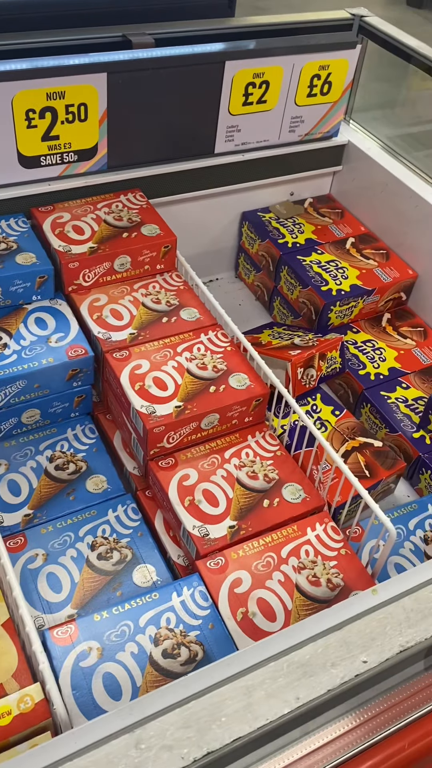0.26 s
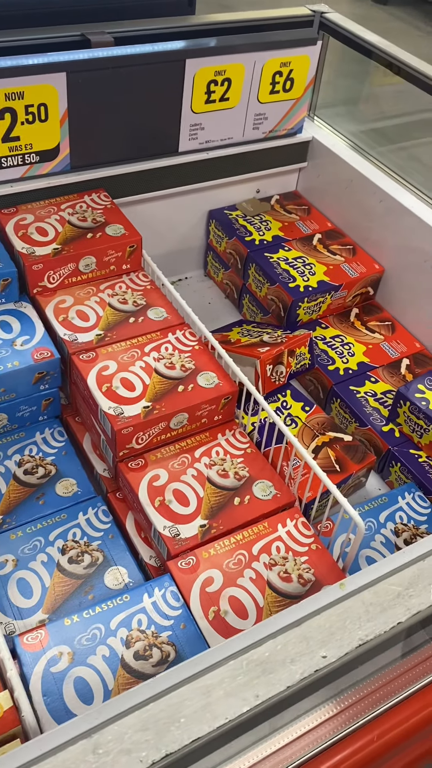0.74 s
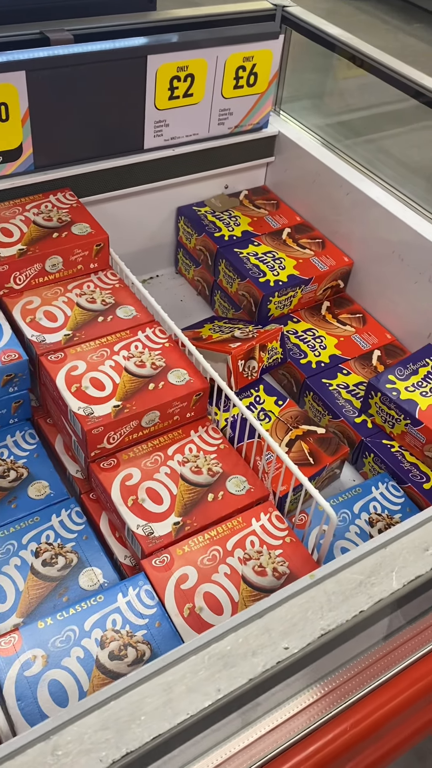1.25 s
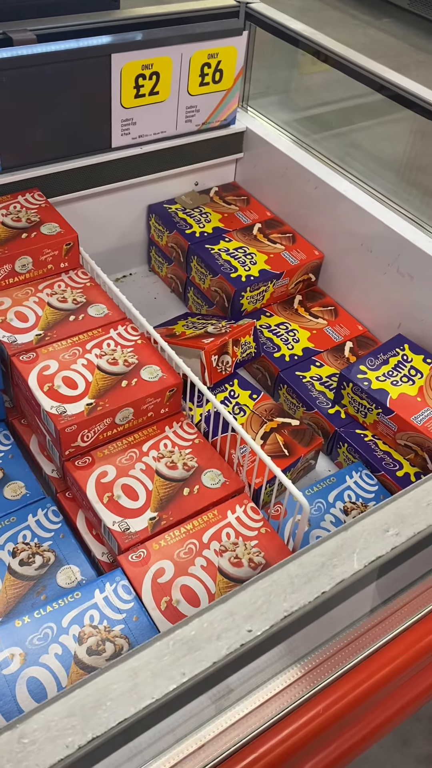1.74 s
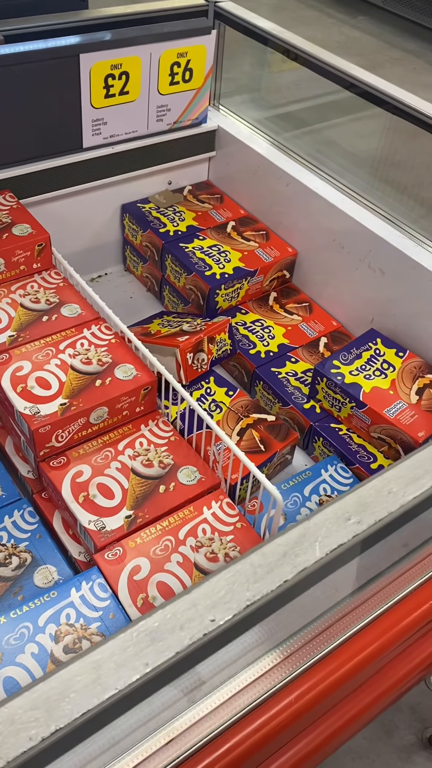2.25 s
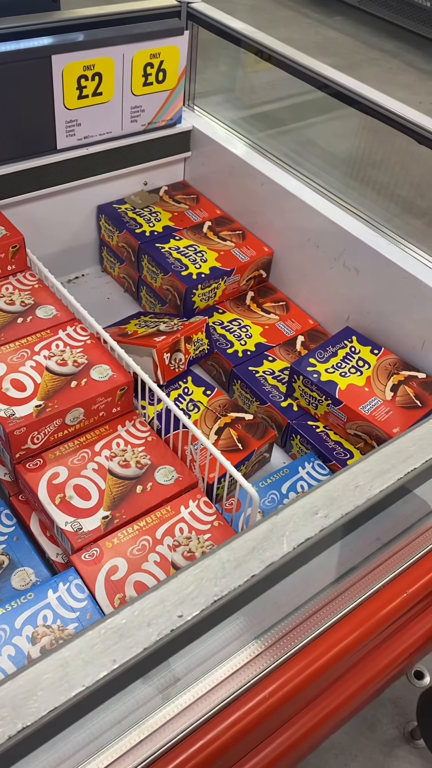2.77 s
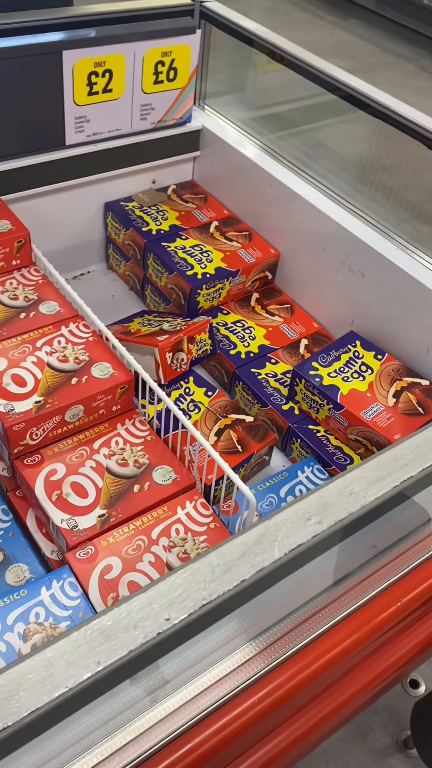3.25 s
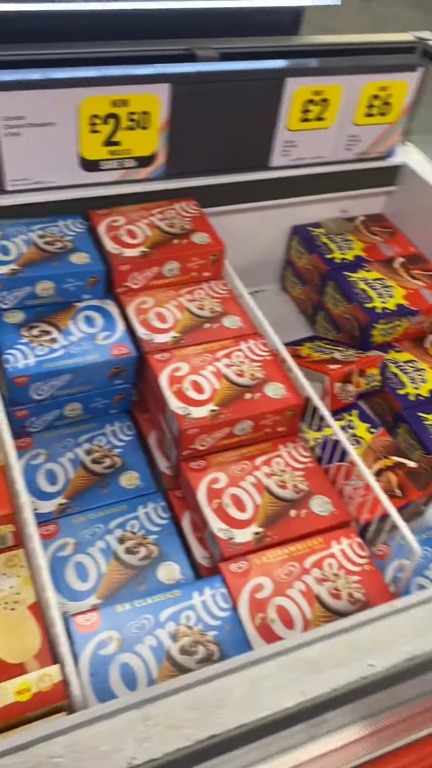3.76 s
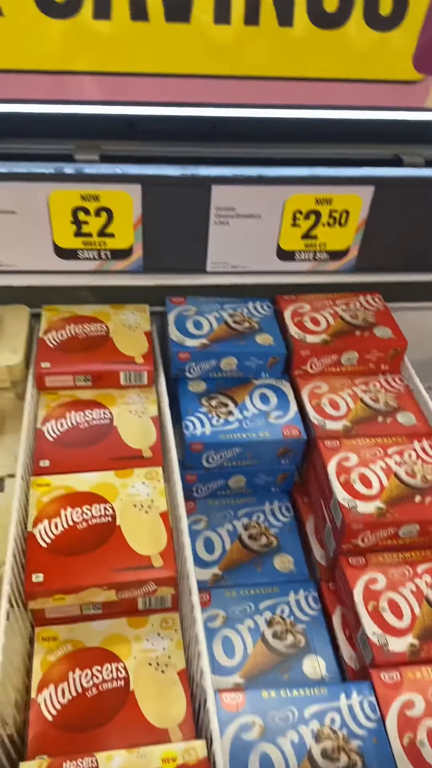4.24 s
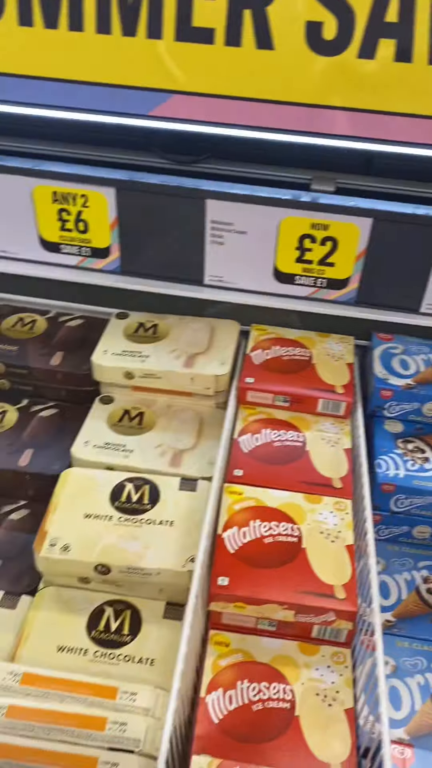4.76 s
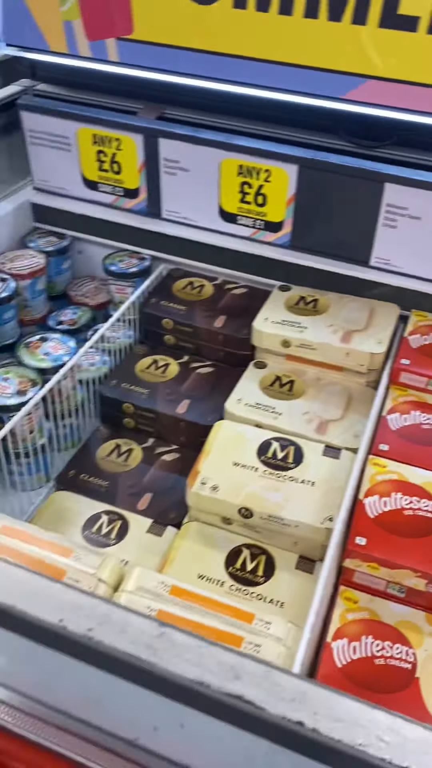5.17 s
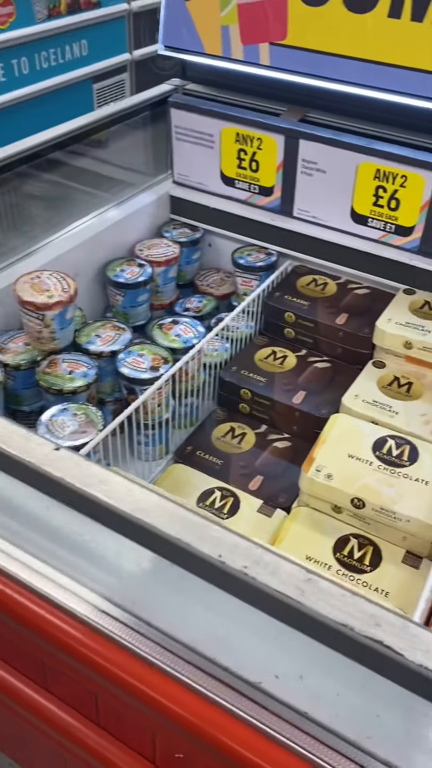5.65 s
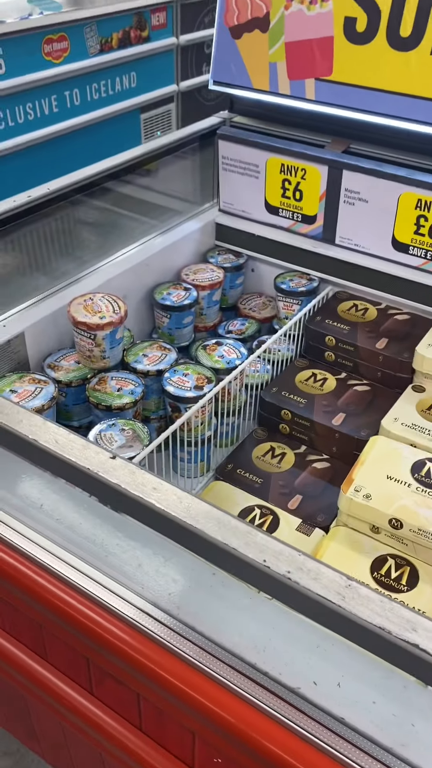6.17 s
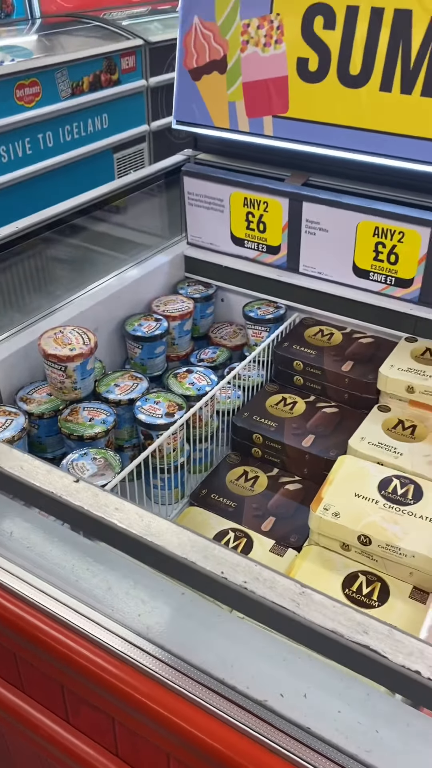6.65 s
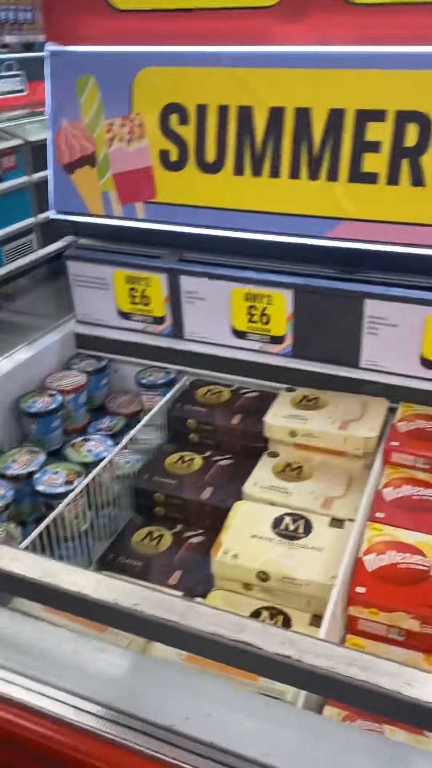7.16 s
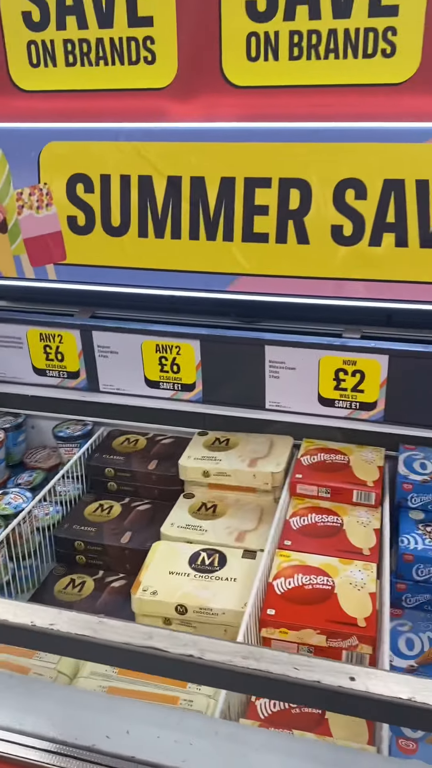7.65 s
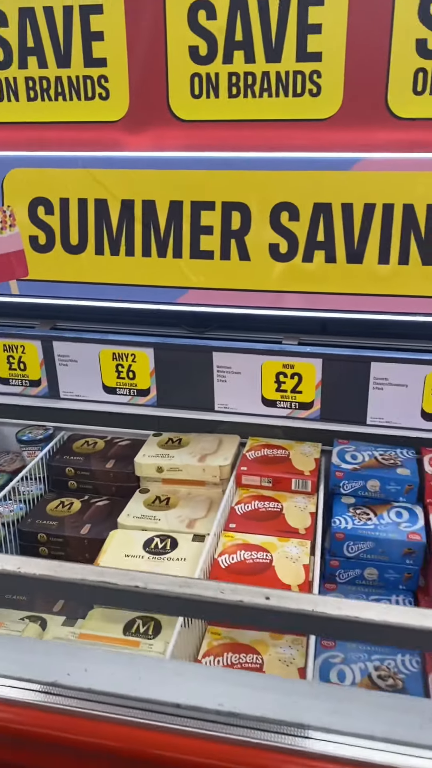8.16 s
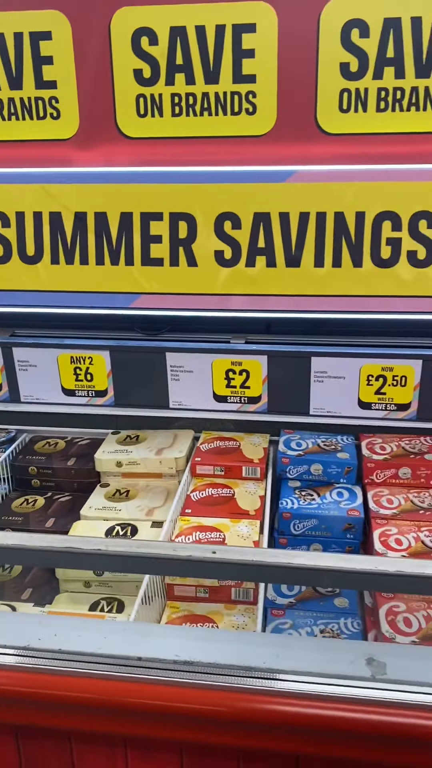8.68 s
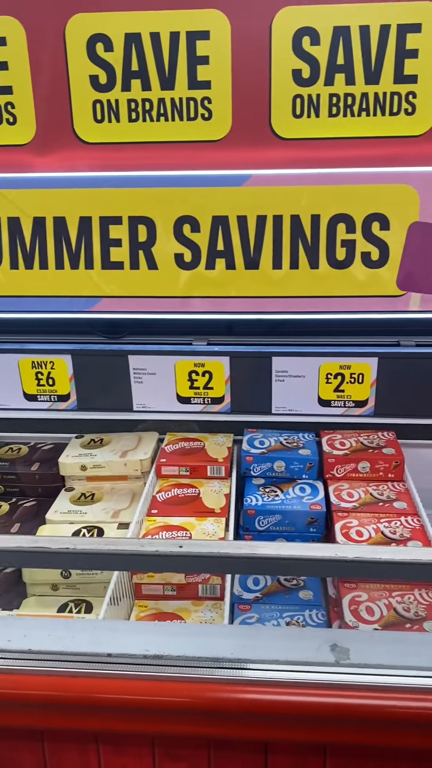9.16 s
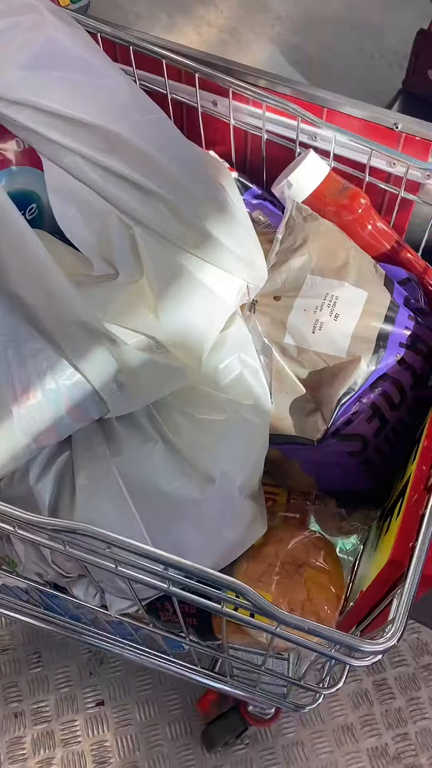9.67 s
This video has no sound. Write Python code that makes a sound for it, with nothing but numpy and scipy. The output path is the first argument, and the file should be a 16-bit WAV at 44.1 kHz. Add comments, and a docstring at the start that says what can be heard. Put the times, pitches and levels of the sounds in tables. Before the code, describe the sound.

A deep mains-like drone from shop freezers fills the foreground, with uneven compressor rumble, breezy hiss and faint high whistling that comes and goes. Small sleeve rustles run throughout, growing in the second half. After one short squeaky shoe scrape with hollow knocks, the drone grows fuller until it ends abruptly. A tiny gap follows, then dull distant room air, thin hiss and small far-off taps, heard from a handheld stereo microphone.

```python
"""A 100 Hz drone hums from a shop's freezer cabinets, with fan and compressor tones and rushing cold air.
Tones are beating or fluttering sines, valve whistles fuzzy ones, and air and rumble are shaped stereo noise.
A listener moves along the cabinets, a jacket rustles in swelling noise, and a shoe scuffs once with rasps and
short ringing knocks. The hum cuts off abruptly; after an instant of silence a quieter part of the shop is heard
as dull ventilation noise and thin hiss. Faint clatter rings far off as short narrow noise bands."""
import sys
import numpy as np
from scipy import signal
from scipy.fft import rfft, irfft, next_fast_len
from scipy.io import wavfile
from scipy.ndimage import uniform_filter1d, map_coordinates

SR = 44100
rng = np.random.default_rng(int(sys.argv[2]) if len(sys.argv) > 2 else 0)


def transcribe(signal):
    """Save signal, clipped to [-1, 1], as a 16-bit WAV file at the path in sys.argv[1]."""
    frames = np.atleast_2d(signal).T
    limited = np.clip(frames, -1, 1)
    pcm = np.round(limited * 32767).astype(np.int16)
    wavfile.write(sys.argv[1], SR, pcm)


N = 437031

# Level of the drone: time_s, level_db
DRONE_LEVEL = [(0, -32.5), (3.4, -29), (4.5, -34.5), (5.5, -28), (6.8, -28), (7.9, -24), (9.4, -21.5)]
# Level of the drone's overtone: time_s, level_db
OVERTONE_LEVEL = [(0, -38), (4.2, -38.5), (5.2, -40), (7.5, -40), (8.6, -45), (9.6, -45.5)]
# How far the compressor lags the overtone: time_s, lag_hz
COMPRESSOR_LAG = [(1.2, 3.3), (1.5, 2.9), (4.0, 2.9), (4.25, 3.35)]
# Fan and compressor tones before trim: pitch_hz, width_hz, first_place_db, second_place_db, third_place_db
MACHINE_TONES = [(49.3, 2, -40, -41, -36), (138, 4, -53, -43, -42), (148.3, 3, -43, -40.5, -45),
                 (248.7, 2, -46, -53, -59), (296, 7, -43, -40.5, -39.5), (311, 12, -43, -40.5, -41),
                 (341, 1.5, -52, -45, -49), (393.5, 1.5, -47, -63, -46), (437, 1.5, -50, -49, -54),
                 (487, 8, -57, -50, -58), (538, 2, -56, -58, -59), (592, 5, -49, -51, -50),
                 (633, 7, -57, -54, -62), (656, 7, -56, -56, -55), (731, 0.8, -62, -53.8, -52.8),
                 (783, 4, -64, -61, -65), (850, 20, -61, -59, -58), (877, 0.4, -63, -53, -53.3),
                 (925, 2.2, -57, -58.5, -58), (1170, 35, -63, -66, -62), (1558, 6, -67, -69, -65),
                 (1848, 6, -67, -62, -62.5), (2280, 35, -60, -61, -59), (2864, 5, -72, -63, -66)]
# The walk along the cabinets: time_s, standing_place (0 to 2, no unit)
WALK = [(0, 0.025), (4.0, 0.03), (5.6, 0.91), (7.0, 1.27), (8.5, 2)]
# Refrigerant whistle at the lower valve, before trim: time_s, level_db
LOW_VALVE_FLOW = [(0, -56.5), (1.05, -57), (1.24, -53), (1.45, -57.5), (2.0, -55), (2.55, -54.5),
                  (2.85, -58), (3.4, -54), (4.1, -56.5), (4.6, -62), (5.15, -54), (5.5, -52), (5.85, -48.5),
                  (6.3, -54), (6.7, -54.5), (7.0, -62), (7.4, -57), (8.3, -54.5), (8.9, -57), (9.6, -58)]
# Refrigerant whistle at the higher valve, before trim: time_s, level_db
HIGH_VALVE_FLOW = [(0.3, -64), (1.15, -62), (1.35, -53.5), (1.54, -51.5), (1.7, -59), (2.0, -55),
                   (2.45, -54.5), (2.7, -59), (3.3, -57), (3.5, -53), (3.8, -64), (4.8, -68), (5.35, -55),
                   (5.8, -56), (6.2, -60), (6.65, -56), (7.2, -67), (8.4, -62), (8.68, -52), (9.0, -61),
                   (9.4, -59), (9.54, -54), (9.62, -61)]
# Colour of the machine rumble: frequency_hz, relative_level_db (per Hz)
RUMBLE_COLOUR = [(20, -27), (36, -23), (45, -40), (54, -4), (68, 3.5), (90, -6.5), (120, -8.5), (170, -7),
                 (240, -9.5), (310, -14), (400, -14), (640, -19.5), (1000, -27.5), (2000, -54.5)]
# Brief peaks of the low noise: peak_s, level_db, length_s
LOW_NOISE_PEAKS = [(2.423, -25, 0.08), (3.582, -25, .12), (7.7, -22.5, 0.086)]
# Colour of the low-noise peaks: frequency_hz, relative_level_db (per Hz)
LOW_PEAK_COLOUR = [(30, -37), (48, -15), (62, 5), (80, -10), (130, -24), (400, -60)]
# Colour of the moving cold air: frequency_hz, relative_level_db (per Hz)
AIR_COLOUR = [(300, -25), (850, -4.5), (1150, 2), (1420, -1.5), (1650, 2), (1980, -1.5), (2550, -0.5),
              (3500, -4.5), (5300, -10.5), (7000, -18.5), (10500, -22), (12300, -9.5), (15500, -30)]
# Sweeps of a sleeve before trim: fastest_s, level_db, length_s
SLEEVE_SWEEPS = [(0.933, -49, .12), (1.15, -46.5, 0.18), (1.414, -46, 0.21), (1.71, -44.5, 0.1),
                 (2.106, -46, .1), (2.28, -48, 0.2), (2.692, -49, 0.14), (2.97, -44.5, 0.33),
                 (3.297, -47.5, 0.2), (3.58, -54, .14), (3.853, -46.5, 0.23), (4.78, -48, 0.77),
                 (5.157, -44, 0.44), (5.37, -48, 0.12), (5.627, -42.5, 0.37), (5.84, -43.5, 0.28),
                 (6.02, -44, 0.18), (6.3, -49, 0.37), (6.615, -36.5, 0.26), (6.924, -42, 0.25),
                 (7.16, -44, 0.17), (7.585, -42, 0.25), (8.017, -47.5, 0.17), (8.45, -48, 0.14),
                 (8.7, -48, 0.17), (9.055, -50.5, 0.22)]
# Colour of the cloth: frequency_hz, relative_level_db (per Hz)
CLOTH_COLOUR = [(500, -2.5), (1400, -2), (2100, 1), (2700, 4.5), (3300, 3.5), (4200, 0), (5400, 2.5),
                (7000, -8.5), (10500, -5.5), (12300, -8.5), (15500, -12)]
# Strokes of the sole, toe, then flat, then full weight: start_s, level_db, rise_s, length_s, lowest_hz
SOLE_STROKES = [(7.747, -29.5, 0.017, 0.13, 1830), (7.836, -25.5, 0.002, 0.095, 700),
                (7.855, -29, 0.003, 0.026, 600)]
# Colour of grit under the sole: frequency_hz, relative_level_db (per Hz)
GRIT_COLOUR = [(500, 8.5), (1300, -2), (2000, -0.5), (2400, -1), (2850, 2), (4000, -3.5), (6000, -5.5),
               (7500, -14), (11000, -10.5), (15500, -18)]
# Rubber rasping as it grips: peak_s, level_db, length_s, pitch_hz, width_hz
RUBBER_SQUEAKS = [(7.766, -34, 0.011, 2000, 110), (7.777, -34.5, 0.018, 2780, 200),
                  (7.864, -31, 0.016, 1220, 160)]
# The sole catching, before each mode's level and scatter: start_s, level_db
SOLE_KNOCKS = [(7.8435, -27), (7.8615, -17.5), (7.898, -26.5)]
# Ringing modes of the shoe on the floor: pitch_hz, relative_level_db, t60_s
SHOE_MODES = [(282, -3, 0.13), (790, -2, 0.053), (860, 4, 0.05), (920, -7, 0.06), (1184, -6, 0.036),
              (1350, -4.5, 0.036), (1720, -11, 0.04)]
# Colour of the quieter place: frequency_hz, relative_level_db (per Hz)
AISLE_COLOUR = [(24, -27), (42, -2), (100, -3.5), (150, -5.5), (215, -17), (275, -10), (330, -12),
                (400, -17.5), (500, -15), (690, -23), (785, -25), (930, -31), (2500, -56), (6000, -56)]
# Colour of its thin hiss: frequency_hz, relative_level_db (per Hz)
AISLE_HISS_COLOUR = [(400, -13), (1100, 2.5), (1800, -2), (2700, -0.5), (4000, -6), (5300, -3.5),
                     (7000, -16), (11000, -13), (15500, -18)]
# Faint far-off clatter: peak_s, level_db, length_s, pitch_hz, width_hz
CLATTER_RINGS = [(1.043, -46, 0.058, 1016, 16), (1.288, -45, 0.06, 820, 25), (6.05, -47, 0.13, 1100, 150),
                 (8.48, -45, 0.063, 1170, 160), (9.72, -43.5, 0.02, 786, 30), (9.725, -49, 0.018, 1333, 25),
                 (9.76, -38.5, .025, 280, 36), (9.772, -47, 0.012, 750, 40), (9.8, -42, 0.032, 285, 40),
                 (9.845, -51, 0.014, 800, 35)]
# Likeness of left and right: frequency_hz, likeness (0 to 1, no unit)
STEREO_LIKENESS = [(130, .999), (280, .975), (400, .88), (600, .45), (820, .42), (1500, .5), (3000, .53),
                   (4800, .42), (5500, .62), (7200, .88), (9000, .76), (12000, .76)]
# Phase by which the left port leads the right: frequency_hz, lead_rad
PORT_LEAD = [(500, 0), (700, .3), (2000, .35), (2600, 1.6), (3300, 2.1), (4000, 1), (4500, 1.4), (5100, .6),
             (7100, 3.1), (10500, 6.2), (13400, 9.4), (15700, 12.2)]

HUM_HZ = 100  # the pitch of the drone
IN_STEP_S = 4.12  # the top of one overtone throb
CUT_S, RESUME_S, FADE_S = 9.658, 9.705, 0.002
TOP_HZ = 15750


def drone(beat_db=-42.0, beat_hz=2.88, beat_start_s=0.093):
    """Motor iron hums at 100 Hz; a slipping compressor just below it beats against the hum."""
    t = clock()
    phase = 2 * np.pi * HUM_HZ * t + 0.2 * wobble(3)
    slip = 2 * np.pi * beat_hz * (t - beat_start_s)
    hum = amp(curve(DRONE_LEVEL)) * np.sin(phase)
    compressor = amp(beat_db) * np.sin(phase - slip + 1.3 * wobble(2.0))
    return np.sqrt(2) * (hum + compressor)


def overtone(compressor_db=-4):
    """A tone at twice the drone's pitch throbs against a compressor tone that lags it by a varying rate."""
    lag = np.cumsum(curve(COMPRESSOR_LAG)) / SR  # in cycles
    lag = lag - np.interp(IN_STEP_S, clock(), lag)
    phase = 2 * np.pi * 2 * HUM_HZ * clock() + 0.2 * wobble(3)
    steady = np.sin(phase)
    compressor = amp(compressor_db + wobble(2.05)) * np.sin(phase - 2 * np.pi * lag)
    return np.sqrt(2) * amp(curve(OVERTONE_LEVEL)) * (steady + compressor)


def fans(pure_db=1.0, flutter_db=1.58):
    """Narrow tones hold steady, wide ones flutter; standing waves set how loud each is from place to place."""
    t, out = clock(), np.zeros((2, N))
    for hz, width, *place_db in MACHINE_TONES:
        steady = np.exp(-(width / 2) ** 2)  # share of power in the pure tone
        flutter = unit(wobble(3 * width) + 1j * wobble(3 * width))
        swing = amp(pure_db) * np.sqrt(steady) + amp(flutter_db) * np.sqrt(1 - steady) * flutter
        carrier = np.exp(2j * np.pi * (hz * t + rng.uniform()))
        tone = np.sqrt(2) * standing_wave(place_db) * swing * carrier
        # each port is turned by this phase, in opposite directions
        apart = np.arccos(along(STEREO_LIKENESS, hz)) / 2 * rng.uniform(-1.1, 1)
        out += np.real(np.outer(np.exp([1j * apart, -1j * apart]), tone))
    return out


def standing_wave(place_db):
    """Walking through a standing wave moves a tone's gain between its levels at the standing places."""
    return amp(np.interp(curve(WALK), np.arange(len(place_db)), place_db))


def whine():
    """Refrigerant whistles through two valves, each swelling with its own flow."""
    low = valve(LOW_VALVE_FLOW, hz=1714, sag_hz_per_s=2.6, width_hz=34, tonal=0.51, trim_db=1.5)
    high = valve(HIGH_VALVE_FLOW, hz=2338, sag_hz_per_s=0, width_hz=22, tonal=0.81, trim_db=3.0)
    return low + high


def valve(flow, hz, sag_hz_per_s, width_hz, tonal, trim_db, flicker_db=2.0, flicker_per_s=32):
    """Flow through a valve whistles: a sputtering tone, sagging at a set rate, in fuzz that differs by port."""
    t = clock()
    drift = np.cumsum(width_hz / 4 * wobble(15)) / SR
    phase = 2 * np.pi * (hz * t - sag_hz_per_s * t ** 2 / 2 + drift)
    core = unit(wobble(30) + 1j * wobble(30) + 1.5)
    fuzz = unit(np.array([wobble(3 * width_hz) + 1j * wobble(3 * width_hz) for port in range(2)]))
    blend = np.sqrt(tonal) * core + np.sqrt(1 - tonal) * fuzz
    whistle = np.real(blend * np.exp(1j * phase))
    flicker = amp(flicker_db * wobble(flicker_per_s))
    return amp(curve(flow) + trim_db) * unit(whistle * flicker)


def cabinets(rumble_db=-29.0, air_db=-44.5, surge_db=0.64, draught_db=0.4):
    """Compressors rumble unevenly, with a few brief low-noise peaks, and uneven cold air streams from the vents."""
    rumble = amp(rumble_db + surge_db * wobble(5)) * rush(RUMBLE_COLOUR)
    low_peaks = sum(rise_and_fall(*row) for row in LOW_NOISE_PEAKS) * rush(LOW_PEAK_COLOUR)
    air = amp(air_db + draught_db * wobble(3.5)) * patchy(rush(AIR_COLOUR), depth_db=1.9)
    return rumble + low_peaks + air


def jacket(trim_db=1.0, rest_db=-49.0, grain_db=0.83, rasp_db=-8, rasp_hz=2650, rasp_width_hz=450):
    """Cloth slides over cloth in fine-grained sweeps over a faint restless stirring; hard sweeps rasp."""
    rise_share = 0.43  # part of a sweep spent speeding up
    power = amp(rest_db + 1.2 * wobble(10)) ** 2
    for s, db, length in SLEEVE_SWEEPS:
        age = clock() - s
        width = length * np.where(age < 0, rise_share, 1 - rise_share)
        power = power + amp(db + trim_db) ** 2 * np.exp(-2 * (age / width) ** 2)
    rough = unit(amp(5.2 * wobble(150)) * band(rasp_hz, rasp_width_hz))
    rasp = amp(rasp_db) * np.sqrt(power / power.max()) * rough
    folds = patchy(rush(CLOTH_COLOUR), depth_db=1.8)  # folds colour the rustle unevenly
    return np.sqrt(power) * (unit(amp(grain_db * wobble(400))) * folds + rasp)


def scuff():
    """The sole rasps over grit and squeaks as it grips, while catches on the floor add small knocks."""
    return sole_slide() + sole_knocks()


def sole_slide(grain_db=-0.5, clump_db=0.6, room_db=-14, room_t60_s=0.66):
    """Grit rolls unevenly under the sole in quick noise strokes with a decaying shop echo; rubber squeaks."""
    slide = np.zeros((2, N))
    for s, db, rise, length, low_hz in SOLE_STROKES:
        age = np.maximum(clock() - s, 0)
        echo = amp(room_db - 60 * age / room_t60_s) ** 2
        power = np.exp(-2 * (age / length) ** 2) + echo
        # the bass rolls off below low_hz
        grit = noise(lambda hz: amp(along(GRIT_COLOUR, hz)) / np.sqrt(1 + (low_hz / (hz + 1)) ** 8))
        slide += np.sqrt(power) * (1 - np.exp(-age / rise)) * amp(db) * grit
    for s, db, length, hz, width in RUBBER_SQUEAKS:
        slide += rise_and_fall(s, db, length) * band(hz, width)
    slide *= unit(amp(clump_db * wobble(300)))
    return slide * unit(amp(grain_db * wobble(770)))


def sole_knocks(scatter_db=3.0, attack_s=0.0015):
    """Each catch of the sole sets off decaying modes with scattered levels and phases."""
    knocks = np.zeros((2, N))
    t = np.arange(SR // 4) / SR
    for s, db in SOLE_KNOCKS:
        start = round(s * SR)
        for hz, mode_db, t60 in SHOE_MODES:
            phase = rng.uniform(0, 2 * np.pi) + 0.5 * rng.standard_normal((2, 1))
            level_db = db + mode_db + scatter_db * rng.standard_normal()
            fade = amp(level_db - 60 * t / t60) * (1 - np.exp(-t / attack_s))
            knocks[:, start:start + len(t)] += fade * np.sin(2 * np.pi * hz * t + phase)
    return knocks


def aisle(murk_db=-35, air_db=-49):
    """Away from the freezers a dull ventilation rush and a thin hiss are left."""
    return amp(murk_db) * rush(AISLE_COLOUR) + amp(air_db) * rush(AISLE_HISS_COLOUR)


def clatter():
    """Things handled far off in the shop ring out briefly as narrow bands of noise."""
    return sum(rise_and_fall(s, db, length) * band(hz, width) for s, db, length, hz, width in CLATTER_RINGS)


def amp(db):
    """Decibels to gain."""
    return 10 ** (np.asarray(db) / 20)


def unit(x):
    """Scale to rms 1."""
    return x / np.sqrt(np.mean(np.abs(x) ** 2) + 1e-20)


def clock():
    """The time of every sample in seconds."""
    return np.arange(N) / SR


def along(points, hz):
    """Read (frequency, value) points on a log frequency axis."""
    f, v = np.transpose(points)
    return np.interp(np.log(hz + 1), np.log(f + 1), v)


def curve(rows):
    """Draw (time, value) rows as one value per sample."""
    return np.interp(clock(), *np.transpose(rows))


def wobble(rate):
    """A smooth random curve with rate knots a second."""
    return map_coordinates(rng.standard_normal(int(N * rate / SR) + 4), [clock() * rate])


def noise(gain):
    """Diffuse stereo noise of rms 1 with a gain per frequency; likeness of the sides varies with frequency."""
    size = next_fast_len(N + 8192)
    hz = np.fft.rfftfreq(size, 1 / SR)
    turn = np.arccos(np.clip(along(STEREO_LIKENESS, hz), -1, 1)) / 2
    spectra = rfft(rng.standard_normal((2, size))) * gain(hz)
    mid, side = irfft(spectra * [np.cos(turn), np.sin(turn)], size)[:, :N]
    return unit(np.array([mid + side, mid - side]))


def rush(colour):
    """Diffuse noise with a given spectrum."""
    return noise(lambda hz: amp(along(colour, hz)))


def band(hz, width):
    """Diffuse noise in one narrow resonance."""
    return noise(lambda f: 1 / (1 + ((f - hz) / width) ** 2))


def rise_and_fall(s, db, length):
    """A gain that rises to its top at time s and falls again."""
    return amp(db) * np.exp(-((clock() - s) / length) ** 2)


def patchy(x, depth_db):
    """Lay patches of random gain, about 700 Hz wide and 70 ms long, over a stereo noise."""
    z = signal.stft(x, nperseg=512)[2]
    field = uniform_filter1d(rng.standard_normal(z.shape[1:]), size=8, axis=0)
    field = uniform_filter1d(field, size=12, axis=1)
    return unit(signal.istft(z * amp(depth_db * unit(field)), nperseg=512)[1][:, :N])


def scene():
    """The freezers, a hard cut to silence, then the quieter aisle."""
    machines = drone() + overtone() + fans() + whine() + cabinets()
    freezers = machines + jacket() + scuff()
    before = np.clip((CUT_S - clock()) / FADE_S, 0, 1)
    after = clock() > RESUME_S
    return freezers * before + aisle() * after + clatter() * (before + after)


def record(dry):
    """Two microphone ports differ in phase, chiefly in the treble; nothing from the band limit up remains."""
    size = next_fast_len(N + 8192)
    hz = np.fft.rfftfreq(size, 1 / SR)
    ports = np.exp(0.5j * np.outer([1, -1], along(PORT_LEAD, hz)))
    return irfft(rfft(dry, size) * ports * (hz < TOP_HZ), size)[:, :N]


dry = scene()
out = record(dry)
transcribe(out)
```